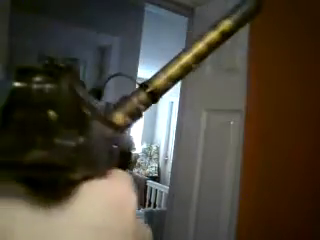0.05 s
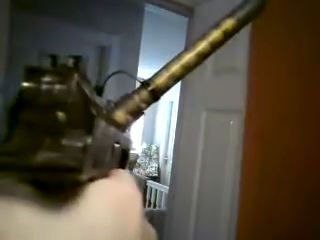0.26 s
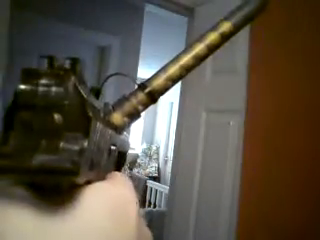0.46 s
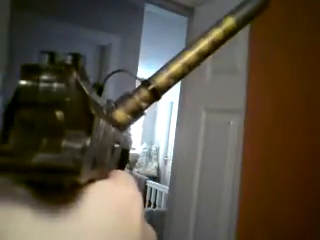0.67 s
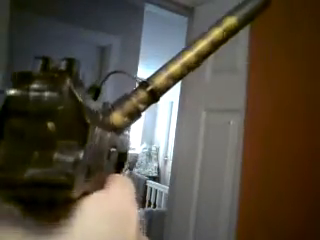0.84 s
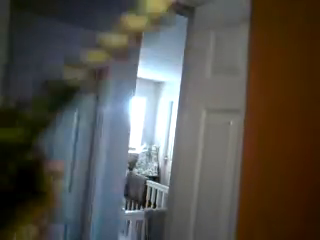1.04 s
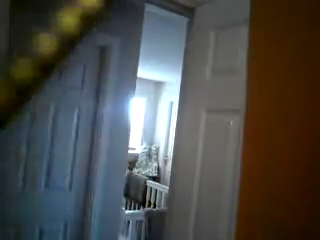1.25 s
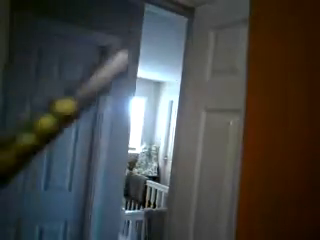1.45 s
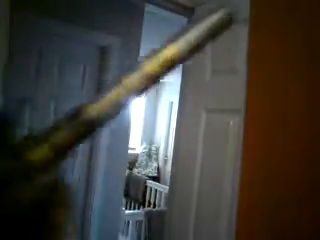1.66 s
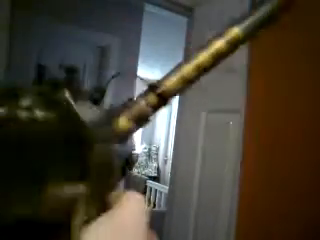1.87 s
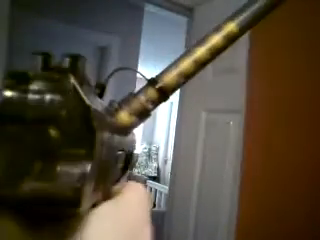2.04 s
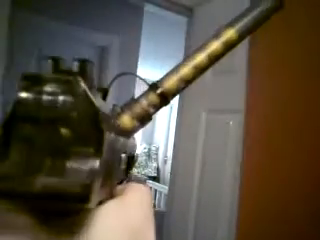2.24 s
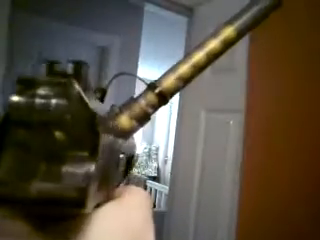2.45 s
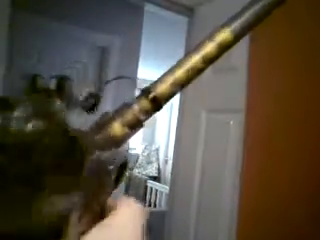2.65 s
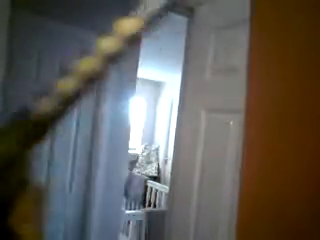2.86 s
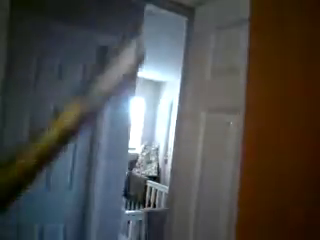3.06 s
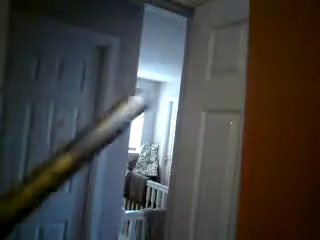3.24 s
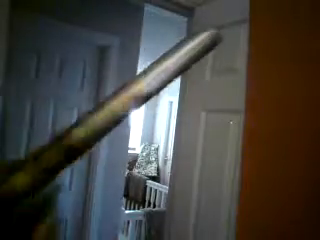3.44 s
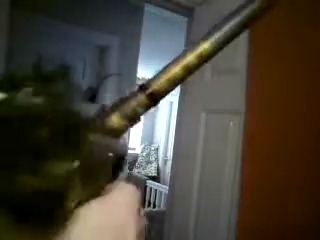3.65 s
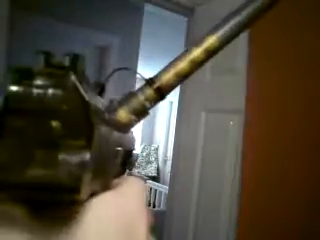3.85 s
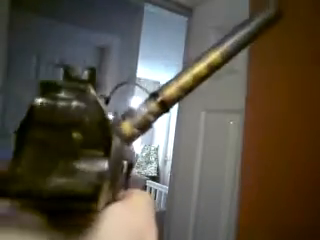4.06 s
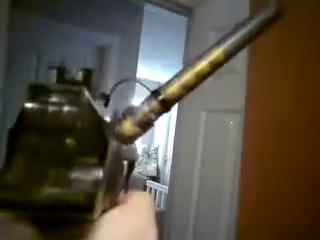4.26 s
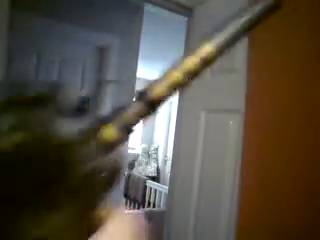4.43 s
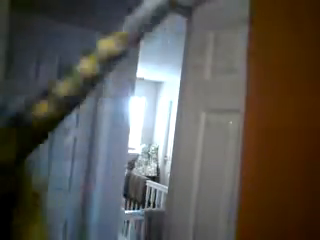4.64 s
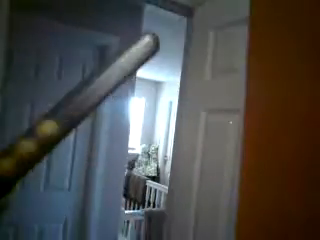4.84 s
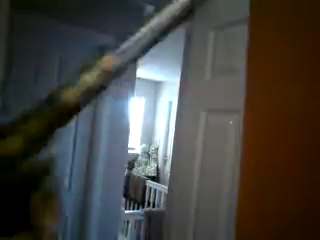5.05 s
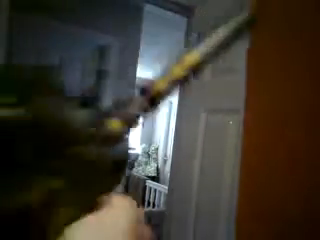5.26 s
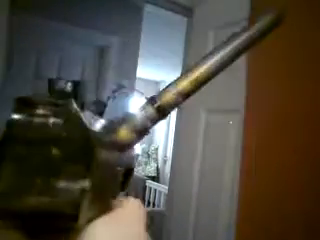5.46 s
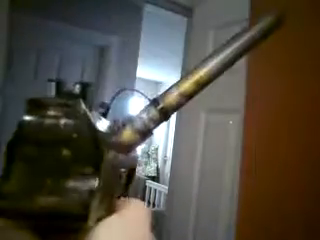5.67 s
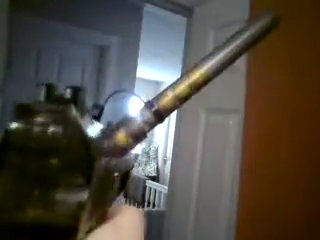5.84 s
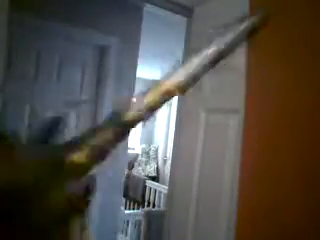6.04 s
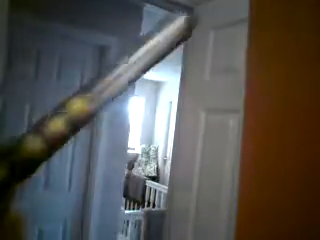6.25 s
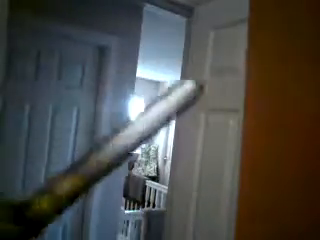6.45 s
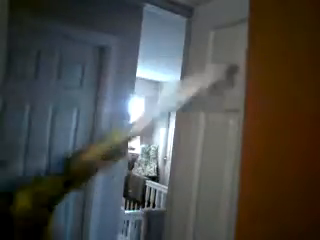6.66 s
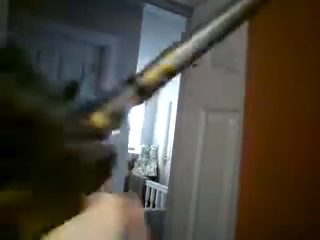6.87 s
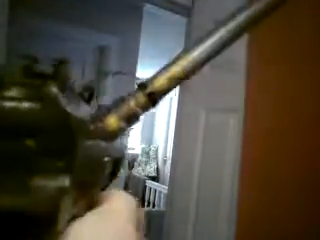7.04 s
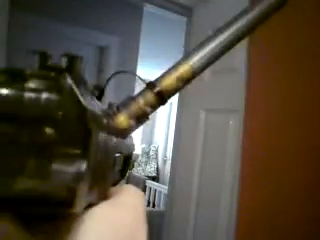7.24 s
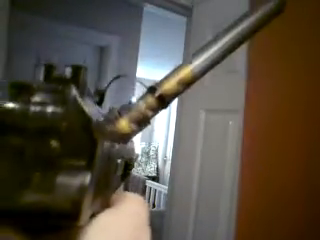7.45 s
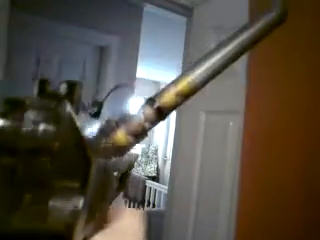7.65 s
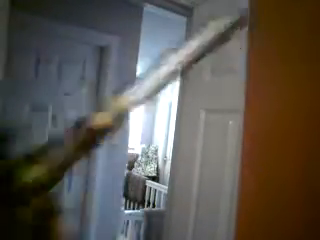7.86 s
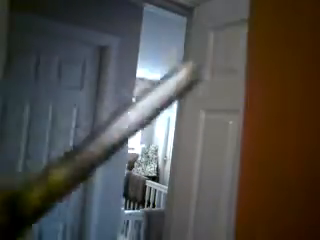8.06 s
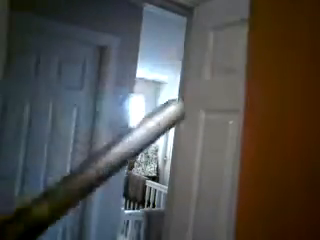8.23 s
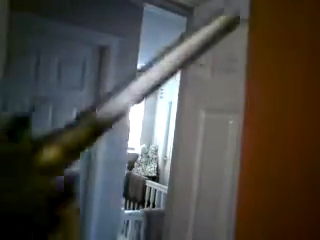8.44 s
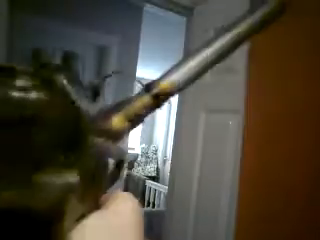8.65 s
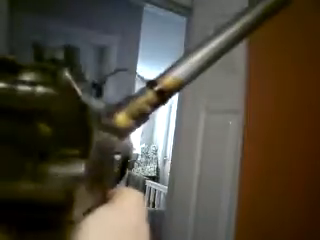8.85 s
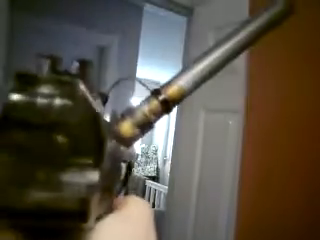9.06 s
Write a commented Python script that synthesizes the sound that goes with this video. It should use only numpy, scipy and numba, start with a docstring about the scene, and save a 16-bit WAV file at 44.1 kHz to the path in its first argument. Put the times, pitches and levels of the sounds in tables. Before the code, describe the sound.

A pump-action paintball pistol fires five times in a hallway, very close to the microphone, at about 0.7, 2.5, 4.2, 5.8 and 7.5 seconds. Each shot is a loud, sharp burst of gas with a hard click and a small low pop, slightly flattened at its peak, leaving a faint metallic spring ring. After every shot the pump rattles back and hits its stop, at about 1.4, 3.2, 4.8, 6.5 and 8.2 seconds. It then knocks forward and slams the breech shut roughly a quarter of a second after each stop, making a quick cluster of bright clacks. In between, loose parts click lightly and a hand rubs softly on the gun. The hallway rings for about half a second after each hit, and a faint steady microphone hiss lies under everything.

```python
"""A pump-action paintball pistol fires five times in a hallway, right beside a small camera.
In each shot a hammer slides, a burst of gas leaves the barrel and a spring rings on. Then the pump
rattles back, knocks forward and slams the breech (the loading opening) shut. In between, the hand
rubs the gun and loose parts click. The hallway rings for about half a second, the microphone hisses
faintly, and the camera's limiter flattens the blasts."""
import sys
import numpy as np
from scipy import signal
from scipy.fft import rfft, irfft
from scipy.io import wavfile
from numba import njit

SR = 44100
rng = np.random.default_rng(int(sys.argv[2]) if len(sys.argv) > 2 else 0)


def int16_out(signal):
    """Quantize to a 16-bit WAV file."""
    q = np.round(np.clip(np.atleast_2d(signal).T, -1, 1) * 32767)
    wavfile.write(sys.argv[1], SR, q.astype(np.int16))


N = 401310

# The pump is pulled back. Each row: time it hits the stop in seconds, level in dB, chatter time in
# seconds, gap from last catch to stop in seconds, growth of the catches in dB, hand rub level in dB.
PUMP_PULLS = [(1.412, 5, 0.0055, 0.017, 4.5, -56), (3.1827, 4.5, 0.0038, .0202, 4.5, -61.5),
              (4.844, 2.5, .0013, 0.021, 4.5, -61), (6.498, 5, .0058, .0165, 3, -62.5),
              (8.184, 6, 0.0063, .0193, 5.5, -62.5)]
# The breech slams shut. Each row: time in seconds, then four levels in dB: the slam, the breech's
# ring and the bolt's ping (both relative to the slam), and the spring.
BREECH_SLAMS = [(1.6466, -2, -0.5, -10, -55.5), (3.4072, -3, 0, -6.5, -74.5), (5.086, -2.5, 5.5, -8, -61),
                (6.769, -3, -3, 2.5, -80), (8.436, -3, 3.5, -8.5, -63.5)]
# The tone of hard parts hitting. Each row: frequency in Hz, level in dB.
CONTACT_TONE = [(40, -40), (200, -40), (500, -34), (720, -9), (1250, -4.5), (2000, -6.5), (3000, -6),
                (3700, -2.5), (4700, -5.5), (6000, -15), (8000, -34), (11000, -35)]
STOP_HZ = 3680  # pitch of a part hitting its stop
TOUCH_S, TOUCH_DB = .0042, -12  # parts touch lightly just before a hard knock


def undb(db):
    """Turn decibels into a number to multiply by."""
    return 10 ** (np.asarray(db) / 20)


def clock(length):
    """The time of each sample in a sound so many seconds long."""
    return np.arange(int(length * SR)) / SR


def fade(t, t60):
    """Die away smoothly, dropping 60 dB in the fade time t60."""
    return np.exp(-np.log(1000) * t / t60)


def unit(x):
    """Scale a sound so that its total energy is 1."""
    return x / np.sqrt(np.sum(x ** 2))


def add(track, s, x):
    """Mix a sound into a track, starting at s seconds."""
    i = int(s * SR)
    track[i:i + len(x)] += x[:N - i]


def on_log_axis(hz, points):
    """Read a table of frequencies and values between its rows."""
    f, value = np.transpose(points)
    return np.interp(np.log(hz + 1), np.log(f), value)


def colour(x, points, size=2048):
    """Filter a sound to give it the tone in a table of frequencies and levels."""
    gains = undb(on_log_axis(np.arange(size + 1) * SR / (2 * size), points))
    # build the filter so that nothing sounds ahead of a hit
    cepstrum = irfft(np.log(gains))
    cepstrum[1:size] *= 2
    cepstrum[size + 1:] = 0
    response = irfft(np.exp(rfft(cepstrum)))[:size]
    return signal.fftconvolve(x, unit(response))[:len(x)]


def ring(modes, t, scatter_db=0, detune=0):
    """A struck part's fading tones (modes); where the blow lands can vary their level and pitch."""
    chance = rng.standard_normal((len(modes), 2))
    return sum(undb(db + scatter_db * a) * fade(t, t60) * np.sin(2 * np.pi * hz * (1 + detune * b) * t)
               for (hz, db, t60), (a, b) in zip(modes, chance))


def hiss():
    """The microphone hisses steadily, with a thin electronic whine."""
    # The tone of the hiss. Each row: frequency in Hz, level in dB.
    hiss_tone = [(15, -44), (25, -4.5), (148, -4.5), (189, -5), (324, -5), (393, -6), (434, -6.5),
                 (625, -8.5), (2070, -8.5), (3450, -7.5), (3890, -9), (7340, -12.5), (8500, -26.5),
                 (11000, -54), (18700, -120)]
    # The tones of the whine. Each row: pitch in Hz, average level in dB.
    whine_tones = [(2396, -90.5), (3036, -87.5), (3569, -81), (7133, -87)]
    t = np.arange(N) / SR
    whine = sum(undb(db) * np.sqrt(2) * np.sin(2 * np.pi * hz * t) for hz, db in whine_tones)
    return undb(-70.5) * colour(rng.standard_normal(N), hiss_tone) + whine


def knock(low_db, chatter, part_hz, part_db=-6, treble_hz=6000):
    """Parts meet in tiny bounces (chatter) that ring the struck part and the gun; loose parts buzz."""
    # The gun's dull body, then its ringing metal. Each row: pitch in Hz, level in dB, fade in seconds.
    gun_modes = [(732, -11, 0.035), (953, -19, 0.022), (1300, -15.5, 0.04), (1690, -14, 0.03),
                 (2300, -23, 0.013), (2640, -9.5, 0.038), (3275, -3.5, 0.052), (3440, 5.5, 0.022),
                 (3648, 5.5, 0.021), (3950, 7, .02), (4600, -7, 0.041), (5300, -9, 0.0066),
                 (2076, -30, .22), (3070, -27, 0.3), (3160, -27, .22), (3380, -27, 0.21), (3583, -25, .22),
                 (4130, -25, .22), (4140, -28, 0.27), (4283, -32, .25)]
    t = clock(.3)
    # the force builds up as the parts press together, then dies away
    force = (t / chatter + .15) * np.exp(-(1.5 * t / chatter) ** 2)
    contacts = unit(rng.standard_normal(len(t)) * rng.random(len(t)) ** 3 * force)
    modes = [(hz, db + low_db * (hz < 2000), t60) for hz, db, t60 in gun_modes]
    body = unit(signal.fftconvolve(contacts, ring(modes, t, scatter_db=2, detune=.003))[:len(t)])
    part = unit(signal.fftconvolve(contacts, ring([(part_hz, 0, .012)], t))[:len(t)])
    crack = unit(colour(contacts, CONTACT_TONE))
    # so small a body gives off little bass, and its plastic shell dulls the top
    shell = signal.butter(2, [600, treble_hz], "band", fs=SR, output="sos")
    hit = signal.sosfilt(shell, body + undb(part_db) * part + undb(-2.5) * crack)
    buzz = unit(colour(rng.standard_normal(len(t)) * fade(t, 0.068), CONTACT_TONE))
    return unit(hit + undb(-7) * buzz)


def scrape(speed, tone=CONTACT_TONE):
    """Sliding makes a stream of tiny uneven slips, louder at higher speed."""
    slips = unit(rng.standard_normal(len(speed)) ** 3) * np.sqrt(len(speed))
    return colour(slips * speed, tone)


def handling(grip_s=0.27, settle_s=0.13):
    """Loose parts click; the hand rubs as it grips before each pull and settles after each slam."""
    # Stray clicks. Each row: start in seconds, level in dB, boost of the low tones in dB.
    clicks = [(0.154, -36.5, 23), (1.062, -32.5, 2), (1.5111, -10, 8), (2.904, -26, 6), (3.025, -28.5, 31),
              (3.718, -26, -8), (3.97, -27.5, 15.5), (5.046, -14, -2), (5.717, -28, 20.5),
              (6.241, -26.5, 8), (6.352, -22, 16.5), (7.052, -26, -8), (7.279, -27, 15), (8.044, -28, 11),
              (8.397, -9, -14)]
    # The tone of a hand rubbing the gun. Each row: frequency in Hz, level in dB.
    rub_tone = [(60, -13.5), (300, -4.5), (700, -8.5), (1300, -3.5), (2400, -9.5), (3300, 1), (4000, 2),
                (4800, -6), (6000, -14.5), (8000, -33.5)]
    out = np.zeros(N)
    for s, *_, grip_db in PUMP_PULLS:
        grip = scrape(np.hanning(int(grip_s * SR)), rub_tone)
        add(out, s - .19 - grip_s / 2, undb(grip_db) * grip)
    for s, *_ in BREECH_SLAMS:
        settle = scrape(np.hanning(int(settle_s * SR)), rub_tone)
        add(out, s + .305 - settle_s / 2, undb(-61.5) * settle)
    for s, db, low_db in clicks:  # light contacts are duller
        add(out, s, undb(db) * knock(low_db, chatter=0.0033, part_hz=3160, treble_hz=3980))
    return out


def shots(hammer_s=0.014):
    """The hammer slides and hits the valve: a low pop together with a gas jet that quickly dies away."""
    # The shots. Each row: start in seconds, then the levels of jet, pop and spring in dB.
    firings = [(0.65, 4, 6.5, -49.5), (2.4998, 3.5, 4, -49.5), (4.2153, 3.5, 0.5, -48.5),
               (5.844, 3.5, 3.5, -52), (7.549, 1.16, -2, -56)]
    # The tone of the gas jet. Each row: frequency in Hz, level in dB.
    jet_tone = [(30, -46), (80, -24.5), (130, -29.5), (280, -17.5), (450, -14), (650, -15), (950, -10.5),
                (2100, -8.5), (2700, -4.5), (3400, 1.5), (4200, -0.5), (5200, -8.5), (8000, -25.5),
                (11000, -41)]
    # The hammer spring, slack after a shot. Each row: pitch in Hz, level in dB, fade in seconds.
    slack_spring = [(895, -3.5, 1.3), (1043, -10, 1.1), (1404, -2.5, 1), (3243, -7, 1), (3278, -8, 1),
                    (3373, -8, .9)]
    pop_modes = [(85, -11.5, 0.05), (204.7, -3.0, 0.056), (418, 8.0, 0.024)]  # same columns
    out, t = np.zeros(N), clock(0.93)
    for s, jet_db, pop_db, spring_db in firings:
        add(out, s - hammer_s, undb(-30.5) * scrape(clock(hammer_s) / hammer_s))
        add(out, s, undb(12.5) * knock(low_db=-6.5, chatter=0.0017, part_hz=3650))
        jet = unit(colour(rng.standard_normal(len(t)) * fade(t, 0.16), jet_tone))
        # the gas leaving the barrel pushes out one low pulse
        pop = unit(ring(pop_modes, t, scatter_db=-1.0, detune=0.018))
        add(out, s, undb(jet_db + 21) * jet + undb(pop_db) * pop)
        add(out, s, undb(spring_db) * ring(slack_spring, clock(2)))
    return out


def pulls(slide_s=.088, catches=4):
    """The pump speeds back along its rods, catches ever sooner and harder, and hits the stop."""
    out = np.zeros(N)
    for s, db, chatter, last_gap, rise_db, _ in PUMP_PULLS:
        add(out, s - slide_s, undb(-41) * scrape(np.linspace(.08, 1, int(slide_s * SR))))
        for lag, bounce_db in [(0, 0), (0.0076, -6.5)]:  # each hit, then its one softer bounce
            for k in range(1, catches + 1):  # counting backwards from the stop
                catch_db = 2 + bounce_db - rise_db * k ** 1.28
                catch = knock(low_db=9.5, chatter=0.0052, part_hz=3500)
                add(out, s + lag - last_gap * k ** 1.08, undb(catch_db) * catch)
            stop = knock(low_db=-2, chatter=chatter, part_hz=STOP_HZ)
            add(out, s + lag, undb(db + bounce_db) * stop)
    return out


def pushes(slide_lead_s=.015, latch_lead_s=.0137):
    """The pump starts forward with a knock, slides on and clicks the latch just before the slam."""
    # The forward knocks. Each row: time in seconds, level in dB, boost of the low tones in dB,
    # pitch of the struck part in Hz.
    pump_pushes = [(1.552, 1.5, -15, 3700), (3.3195, 3, -5, 3950), (4.972, -4, 5, 3740),
                   (6.674, 3, 4, 4250), (8.324, -1.5, 4, 4050)]
    out = np.zeros(N)
    for (s, db, low_db, part_hz), (shut, *_) in zip(pump_pushes, BREECH_SLAMS):
        start = s - slide_lead_s
        add(out, start, undb(-44.5) * scrape(np.linspace(.5, 1, int((shut - start) * SR))))
        add(out, s - TOUCH_S, undb(db + TOUCH_DB) * knock(low_db, TOUCH_S, part_hz))
        add(out, s, undb(db + 2.5) * knock(low_db, chatter=0.0048, part_hz=part_hz))
        latch = knock(low_db=-12.5, chatter=0.0045, part_hz=4530, part_db=8)
        add(out, shut - latch_lead_s, undb(-7) * latch)
    return out


def slams(bass_cut_hz=400):
    """The bolt touches, snaps the breech shut and sets the squeezed spring ringing."""
    # The ring of the closed breech. Each row: pitch in Hz, level in dB, fade in seconds.
    breech_modes = [(400, -13, .022), (680, -9, .018), (950, -6, .013), (1350, -1, .014), (1620, 4, .016),
                    (2000, -4, .008), (2600, 2, .01)]
    # The hammer spring, squeezed by pumping. Each row: pitch in Hz, level in dB, fade in seconds.
    tight_spring = [(1168, -1, 1.2), (1529, 1.5, 1.25), (2280, -6, 1.5), (2939, -10, 1.6), (3052, -13, 2)]
    out = np.zeros(N)
    for s, db, breech_db, ping_db, spring_db in BREECH_SLAMS:
        breech = unit(ring(breech_modes, clock(.1), scatter_db=1.5, detune=.015))
        touch = knock(low_db=-1.5, chatter=TOUCH_S, part_hz=STOP_HZ)
        snap = knock(low_db=1, chatter=0.0052, part_hz=2816, part_db=ping_db, treble_hz=7190)
        add(out, s - TOUCH_S, undb(db + TOUCH_DB + 9) * touch)
        add(out, s, undb(db + 8) * snap)
        add(out, s, undb(db + breech_db - 8) * breech)
        add(out, s, undb(spring_db) * ring(tight_spring, clock(1.8)))
    return signal.sosfilt(signal.butter(2, bass_cut_hz, "high", fs=SR, output="sos"), out)


def hallway(x, build_s=0.0098, first_echo_s=.004, round_trip_s=.0072):
    """Near walls and doors give separate echoes, which blur into a smooth, fading tail."""
    # How long the hallway rings. Each row: frequency in Hz, fade in seconds.
    ring_times = [(60, 0.22), (150, 0.6), (250, 0.65), (550, 0.56), (1100, 0.61), (2200, 0.52),
                  (4400, 0.53), (8000, 0.45)]
    t = clock(0.74)
    edges = np.r_[0, 100 * 2 ** np.arange(8), SR]  # bands an octave wide
    noise = rfft(rng.standard_normal(len(t)))
    hz = np.arange(len(noise)) * SR / len(t)
    tail = np.zeros(len(t))
    for lo, hi in zip(edges, edges[1:]):
        band = irfft(noise * (hz >= lo) * (hz < hi), len(t))
        tail += band * fade(t, on_log_axis((lo + hi) / 2, ring_times))
    tail = unit(tail * (1 - np.exp(-t / build_s)))
    strengths = rng.standard_normal(len(t))
    arrivals = (rng.random(len(t)) < 700 / SR) * (t > first_echo_s)  # about 700 echoes a second
    near = unit(strengths * arrivals * fade(t, 0.18))
    # sound bounces to and fro between the two facing walls
    bounces = (np.arange(len(t)) % int(round_trip_s * SR) == 0) * (t > 0)
    flutter = unit(bounces * fade(t, 0.091))
    echoes = undb(-7.5) * near + undb(-15) * flutter + undb(-13.5) * tail
    return x + signal.fftconvolve(x, echoes)[:N]


@njit
def follow(x, attack, release):
    """Track a sound's peaks, with rise (attack) and fall (release) times in seconds."""
    out, level = np.empty(len(x)), 0.
    up, down = 1 - np.exp(-1 / (attack * SR)), 1 - np.exp(-1 / (release * SR))
    for i in range(len(x)):
        level += (abs(x[i]) - level) * (up if abs(x[i]) > level else down)
        out[i] = level
    return out


def scene():
    """The gun in the hallway, over the hiss, in one channel."""
    gun = shots() + pulls() + pushes() + slams() + handling()
    return (hallway(gun) + hiss())[None]


def record(dry):
    """The camera's limiter turns loud peaks down; what slips by is rounded, and the top treble is cut."""
    ceiling, full_scale, top_hz = .34, .6, 8680
    peaks = follow(dry[0], attack=.00003, release=0.0063)
    gain = 1 / np.maximum(1, peaks / ceiling)
    rounded = full_scale * np.tanh(dry * gain / full_scale)
    treble_cut = signal.firwin(161, top_hz, window=("kaiser", 8), fs=SR)
    return signal.fftconvolve(rounded, treble_cut[None], mode="same")


dry = scene()
out = record(dry)
int16_out(out)
```